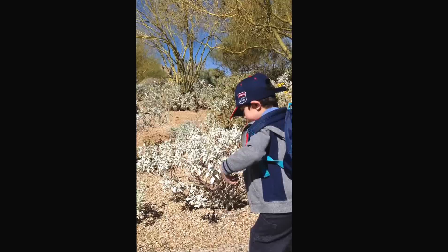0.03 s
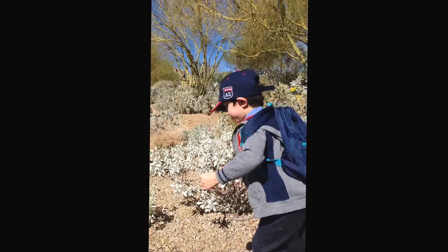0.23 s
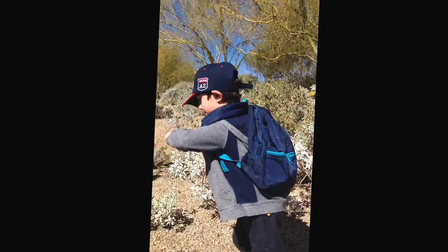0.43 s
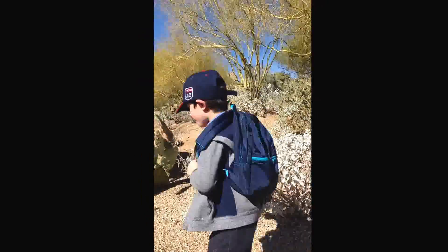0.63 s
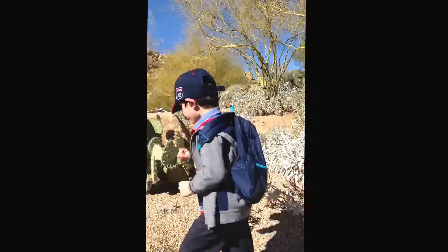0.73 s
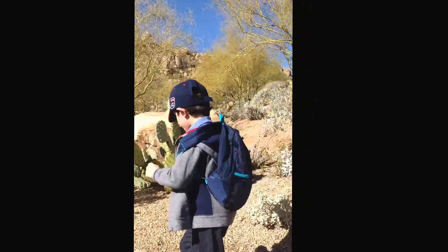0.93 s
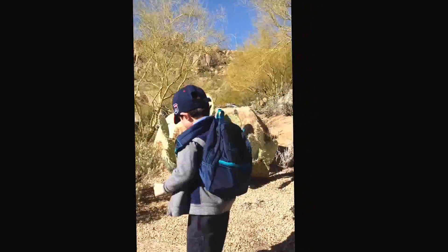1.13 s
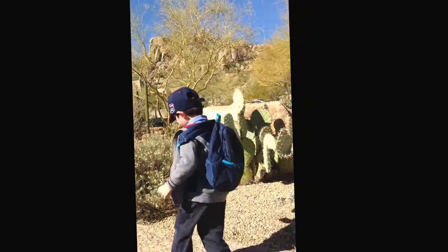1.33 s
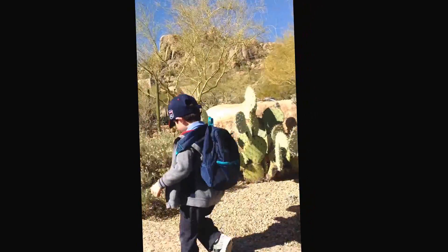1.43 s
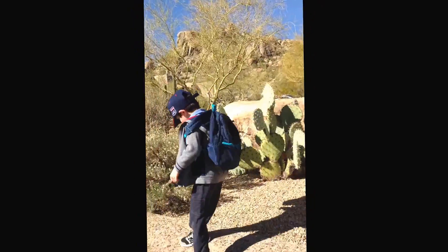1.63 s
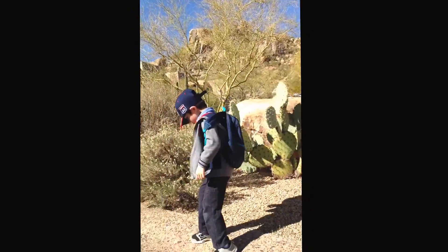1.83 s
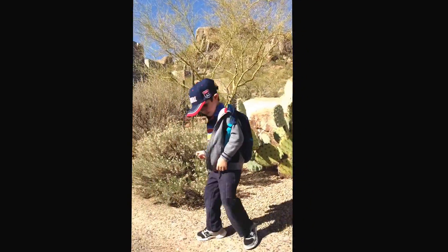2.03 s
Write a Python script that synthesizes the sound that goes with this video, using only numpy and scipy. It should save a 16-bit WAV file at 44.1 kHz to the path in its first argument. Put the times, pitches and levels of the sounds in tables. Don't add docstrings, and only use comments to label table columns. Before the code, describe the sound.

Gravel footsteps, gritty and close, with low wind thumps at first and a faint metal zipper jingle

```python
import sys
import numpy as np
from scipy import signal
from scipy.fft import rfft, irfft
from scipy.io import wavfile
from scipy.ndimage import uniform_filter1d

SR = 44100
rng = np.random.default_rng(int(sys.argv[2]) if len(sys.argv) > 2 else 0)


def magnitude_from_level(level_db):
    exponent = np.asarray(level_db, float) / 20
    return 10 ** exponent


def put_to_file(sound):
    columns = np.atleast_2d(sound).T
    safe = np.clip(columns, -1, 1)
    whole_steps = np.round(safe * 32767)
    wavfile.write(sys.argv[1], SR, whole_steps.astype(np.int16))


N = 91728


def evened(x):
    return x / np.sqrt(np.mean(x ** 2) + 1e-20)


def add(mix, start_s, sound):
    part = mix[round(start_s * SR):][:len(sound)]
    part += sound[:len(part)]


def resonate(x, hz, width_hz):
    turn = np.exp(2j * np.pi * np.cumsum(hz * np.ones(len(x))) / SR)
    r = np.exp(-np.pi * width_hz / SR)
    smooth = signal.lfilter([(1 - r) ** 2], [1, -2 * r, r * r], x / turn)
    return 2 * (turn * smooth).real


def tilt(x, db_per_octave, low_hz):
    u = np.fft.rfftfreq(len(x), 1 / SR) / low_hz + 1e-6
    slope = magnitude_from_level(db_per_octave * np.log2(1 + u))
    low_cut = u ** 2 / (1 + u ** 2)
    return irfft(rfft(x) * slope * low_cut, len(x))


def grains(count, per_s, spread_db):
    chance, size, sign = rng.random((count, 3)).T
    return (chance < per_s / SR) * magnitude_from_level(-spread_db * np.log(size + 0.0173)) * np.sign(sign - .5)


def blip(hz, cycles):
    turns = np.arange(round(5 * cycles * SR / hz)) * hz / SR
    soft_start = 1 - np.exp(-turns / 0.661)
    return np.sin(2 * np.pi * turns) * np.exp(-2 * turns / cycles) * soft_start * 2


# frequency [Hz], level [dB per Hz].
HUSH = [(24, -17.5), (40, 5), (112, 3), (345, -10), (1300, -17.5), (1630, -18), (8990, -26.5),
        (14500, -25.5), (16000, -37.5)]
HUSH_DB, PATCH_DB = -55, 1.08
BREEZE_HZ, BREEZE_DB, BREEZE_LUMP_DB = 72.9, -63, -7


def hush():
    frames, hz = N // 256 + 5, np.fft.rfftfreq(1024, 1 / SR)
    a, b, patches = rng.standard_normal((frames, 513, 3)).T
    patches = evened(uniform_filter1d(uniform_filter1d(patches, 14, 0), 10, 1))
    f, db = np.transpose(HUSH)
    curve_db = np.interp(np.log(hz + 1), np.log(f), db)[:, None]
    spectrum = (a + 1j * b) * magnitude_from_level(curve_db + PATCH_DB * patches)
    air = evened(signal.istft(spectrum, nperseg=1024, noverlap=768)[1][:N])
    rumble, lumps = rng.standard_normal((N, 2)).T
    lumps = evened(uniform_filter1d(uniform_filter1d(lumps, 2500), 2500))
    breeze = evened(resonate(rumble, BREEZE_HZ, 40)) * magnitude_from_level(BREEZE_DB + BREEZE_LUMP_DB * lumps)
    return magnitude_from_level(HUSH_DB) * air + breeze


EDDY_WIDTH, EDDY_TILT_DB = 1.3, -5
STEADY = .75
SPRAY_DB, SPRAY_HZ = -12, 336.3


def gust(centre, length, db, hz):
    a, b = rng.standard_normal((6000, 2)).T
    eddy = resonate(resonate(a, hz, EDDY_WIDTH * hz), hz / 2, 3 * hz)
    eddy = evened(tilt(eddy, EDDY_TILT_DB, 54.4))
    swell = uniform_filter1d(abs(signal.hilbert(eddy)), 500)
    eddy = evened(eddy / (swell + 0.15) ** STEADY)
    spray_hz = 2.164 * hz
    spray = evened(resonate(resonate(b, spray_hz, SPRAY_HZ), spray_hz, SPRAY_HZ))
    spray *= magnitude_from_level(SPRAY_DB) * hz / 200
    n = min(round(1.3 * length * SR), 5000)
    return centre - n / 2 / SR, magnitude_from_level(db) * np.hanning(n) * evened((eddy + spray)[800:800 + n])


# centre [s], length [s], level [dB], eddy pitch [Hz].
GUSTS = [(0.047, 0.0371, -33.5, 150), (.066, 0.028, -23, 109), (0.099, 0.0616, -25, 150),
         (0.151, 0.046, -30, 90), (0.187, 0.0483, -25.5, 100), (0.231, 0.04186, -16.5, 210),
         (0.248, 0.03048, -20, 240), (0.269, 0.0443, -25.5, 190), (0.328, 0.0833, -40, 110.4),
         (0.407, .1, -38.5, 171.9), (0.48, 0.045, -39, 150), (0.512, 0.0392, -34.5, 110),
         (0.548, 0.042, -42.5, 100), (0.613, 0.02133, -43.5, 147), (0.673, 0.0957, -38, 100),
         (.749, 0.0342, -25, 100.2), (0.824, 0.0519, -39, 150), (0.859, 0.022, -27, 91.6),
         (0.88, .025, -26, 177.5), (0.909, 0.032, -41, 100), (1.393, 0.08, -64, 80), (1.58, 0.057, -52, 80),
         (2.027, .08, -48.5, 80)]


def gusts():
    out = np.zeros(N)
    for row in GUSTS:
        add(out, *gust(*row))
    return out


DUCK_OVER_DB, DUCK, RECOVER_DB_PER_S = -19.5, 0.284, 69


def ducking():
    t = np.arange(N) / SR
    over_db = []
    for centre, length, db, _ in GUSTS:
        recovery_db = RECOVER_DB_PER_S * np.maximum(t - centre, 0)
        not_yet_db = 900 * np.maximum(centre - length / 2 - t, 0)
        over_db.append(db - DUCK_OVER_DB - recovery_db - not_yet_db)
    return magnitude_from_level(-DUCK * np.maximum(np.max(over_db, axis=0), 0))


# pitch [Hz], level [dB], time to fall 60 dB [s].
PULL = [
    (4697, -4, .12),
    (7730, -24, .05),
    (9100, -22, .012),
    (11650, 0, .14),
    (13900, -16, .012),
    (14490, -5, .1),
]
# start [s], length [s], level [dB],
# lowest mode extra [dB], highest mode extra [dB].
TAPS = [(0.05, .013, -47, -18.5, -16), (0.066, .006, -61.5, -15.5, -11.5), (.748, 0.036, -63, -14.5, -4),
        (0.918, 0.038, -57, -5.5, -5), (0.935, 0.046, -60.5, 7.5, -1.5), (0.998, 0.0102, -66, 10, 1.5),
        (1.046, 0.062, -64.5, 4.5, 3.5), (1.112, 0.0091, -65.5, 14, 0.5),
        (1.1752, 0.0396, -42, -11.5, -10.5), (1.214, 0.0457, -54, 4, -4), (1.298, 0.0081, -63, -11.5, 7.5),
        (1.448, 0.0065, -49, -17, -9.5), (1.4615, .008, -48, -19.5, -12.5),
        (1.495, 0.0164, -59, -8.5, -9.5), (1.666, 0.0055, -60, 0.5, -7.5),
        (1.7163, 0.007, -58.5, -10.5, -6.5), (1.763, 0.0085, -68, 7.5, -6)]
RATTLE_PER_S, FLUTTER = 300, .4
SPLIT_HZ = 32
DAMP_S, TINK_DB = .006, 2


def zipper():
    out, t = np.zeros(N), np.arange(5000) / SR
    for s, length, db, low_db, high_db in TAPS:
        lean = [low_db, 0, 0, 0, 0, high_db]
        damp = np.exp(-np.maximum(t - length, 0) / DAMP_S)
        for (hz, mode_db, t60), lean_db in zip(PULL, lean):
            taps = np.clip(grains(3000, RATTLE_PER_S, 1), -1.5, 1.5)[:round(length * SR)] * FLUTTER
            taps[0] = 1
            pair = np.sin(2 * np.pi * hz * t) + .5 * np.sin(2 * np.pi * (hz + SPLIT_HZ) * t)
            ring = magnitude_from_level(db + mode_db + lean_db - 60 * t / t60) * pair
            add(out, s, signal.fftconvolve(taps, ring)[:len(t)] * damp)
        tink = tilt(rng.standard_normal(600), 0, 6000) * np.exp(-t[:600] / .004)
        add(out, s, magnitude_from_level(db + TINK_DB) * tink)
    return out


# pitch [Hz], width [Hz], level [dB].
SOLE = [
    (430, 220, 0),
    (720, 320, -4),
    (1300, 550, -9),
    (2250, 600, -11),
]
RISE = .2
GRAINS_PER_S, GRAIN_SPREAD_DB, GRIT_HZ = 2800, 3, 1800
THUDS_PER_S, SCUFF_DB = 240, -4


def crunch(start, length, db, thud_db, bright_db):
    n = round(length * 1.88 * SR)
    u = np.arange(n) / (length * SR)
    press = np.minimum(u / RISE, 1) * np.clip((1.3 - u) / 0.6114, 0, 1)
    grit = evened(grains(n, GRAINS_PER_S, GRAIN_SPREAD_DB)) + magnitude_from_level(SCUFF_DB) * rng.standard_normal(n)
    thud = np.zeros(n)
    for hz, width_hz, mode_db in SOLE:
        shifts = grains(n, THUDS_PER_S, 3.89)
        thud += magnitude_from_level(mode_db) * evened(resonate(shifts, hz * rng.uniform(0.758, 1.254), width_hz))
    return start, magnitude_from_level(db) * press * (evened(tilt(grit, bright_db, GRIT_HZ)) + magnitude_from_level(thud_db) * evened(thud))


# start [s], length [s], level [dB], sole thud re grit [dB], brightness [dB per
CRUNCHES = [(0.032, 0.0322, -51, 8, -1.5), (0.059, 0.0458, -60, 10.5, -9), (0.26, 0.069, -57, -22, -17.5),
            (0.329, 0.098, -55, -1.5, -10), (.3, 1.317, -61, 2.5, -10.5),
            (0.604, 0.0246, -52.5, 2.5, -21.5), (0.618, 0.0133, -49.5, 5, -27),
            (0.677, 0.0789, -51, 12, -9.5), (0.792, 0.0376, -60.5, 9, -24), (0.853, 0.0148, -55, 8, -7.5),
            (0.867, 0.025, -60, 18.5, -8), (0.921, 0.0676, -54.5, 10.5, -10), (1.033, 0.069, -64, 3, -11),
            (1.105, 0.0314, -51, -2.5, -6), (1.137, 0.0145, -59.5, 11.5, 5.5),
            (1.17, 0.0204, -52.5, 3.5, -1), (1.194, 0.077, -55.5, 7.5, -7), (1.359, 0.0483, -55, 2.5, -5.5),
            (1.444, 0.091, -52.5, -1, -12.5), (1.609, 0.0234, -60, 10, -21), (1.67, 0.091, -59.5, -5.5, -7),
            (1.785, 0.089, -52, -2.5, -5.5), (1.826, 0.0365, -52, -9.5, -7.5),
            (2.014, 0.017, -61.5, -0.5, -4)]
# start [s], peak [dB], pitch [Hz].
STONES = [(0.034, -30.5, 2900), (0.0611, -34.5, 3930), (0.084, -38, 8000), (0.2646, -34.5, 2130),
          (0.61, -22, 1426), (.6095, -35, 4430), (.625, -32.5, 2160), (.688, -29, 1800),
          (0.7977, -35.5, 2050), (.81, -55, 1500), (0.8549, -37, 6050), (0.8781, -32, 2010),
          (0.932, -34, 4540), (1.123, -25, 8000), (1.1252, -27, 6640), (1.2185, -31, 1480),
          (1.27, -37, 1980), (1.3553, -43, 2460), (1.3667, -35.5, 6140), (1.384, -34, 5000),
          (1.396, -38.5, 3100), (1.6113, -37.5, 4460), (1.6755, -32, 3980), (1.691, -40, 5170),
          (1.70, -34, 1910), (1.7206, -32, 3720), (1.839, -27.5, 5460)]
STONE_CYCLES, STONE_DB = 1.0, 3
# start [s], peak [dB], pitch [Hz].
KNOCKS = [(0.094, -26, 428.5), (.699, -29.5, 645), (0.928, -28.5, 769), (.95, -22.5, 414.5),
          (0.997, -50, 587), (1.137, -39.5, 252), (1.215, -36.5, 532), (1.236, -37, 416), (1.364, -40, 203),
          (1.383, -38.5, 350.5), (1.459, -38.5, 611), (1.494, -37, 571), (1.519, -38.5, 575.5),
          (1.611, -48.5, 426), (1.623, -40.5, 215)]
KNOCK_CYCLES, KNOCK_DB = 2.4, 1


def footsteps():
    out = np.zeros(N)
    for row in CRUNCHES:
        add(out, *crunch(*row))
    for s, db, hz in STONES:
        scatter = evened(resonate(rng.standard_normal(400), hz, 1.75 * hz))
        scatter *= np.exp(-np.arange(400) / 70) * 0.21
        add(out, s, magnitude_from_level(db + STONE_DB) * scatter)
        add(out, s, magnitude_from_level(db + STONE_DB) * blip(hz, STONE_CYCLES))
    for s, db, hz in KNOCKS:
        add(out, s, -magnitude_from_level(db + KNOCK_DB) * blip(hz, KNOCK_CYCLES))
    return out


def scene():
    mix = hush() * ducking() + gusts() + zipper() + footsteps()
    return mix[None]


def top_cut(x):
    return signal.sosfilt(signal.butter(12, 16470, fs=SR, output="sos"), x)


LOW_CUT_HZ, EDGE_HZ, START_S = 39.6, 15300, .0348


def record(dry):
    x = signal.lfilter(*signal.butter(2, LOW_CUT_HZ, "high", fs=SR), dry)
    x = signal.oaconvolve(x, signal.firwin(301, EDGE_HZ, fs=SR)[None], "same")
    x = x * (np.arange(N) >= START_S * SR)
    return top_cut(x)


dry = scene()
out = record(dry)
put_to_file(out)
```